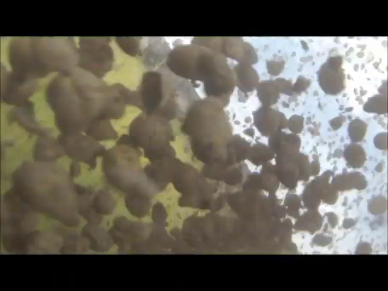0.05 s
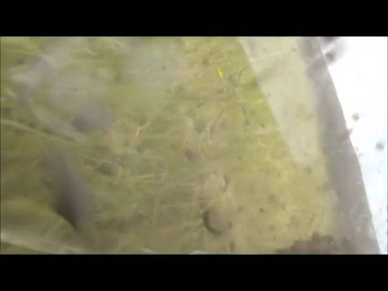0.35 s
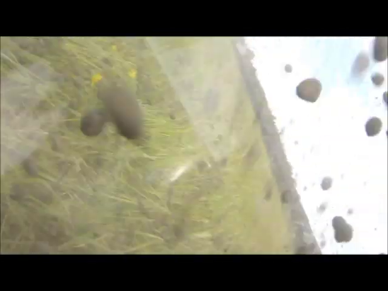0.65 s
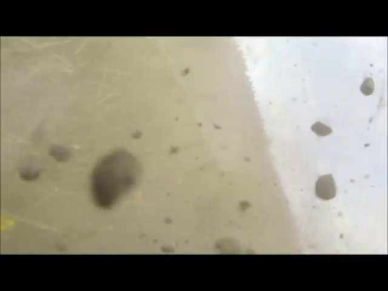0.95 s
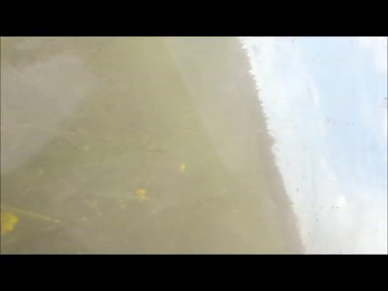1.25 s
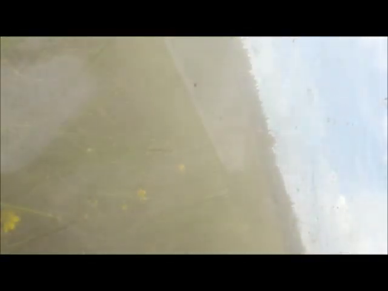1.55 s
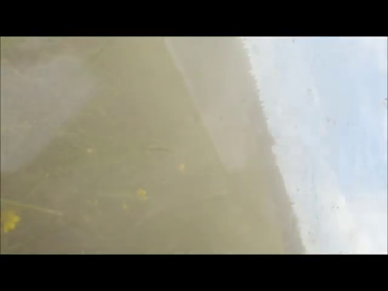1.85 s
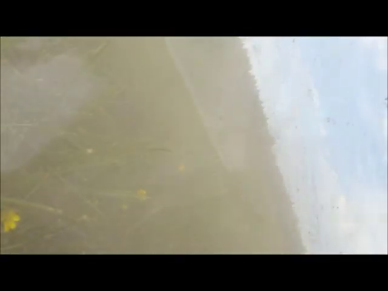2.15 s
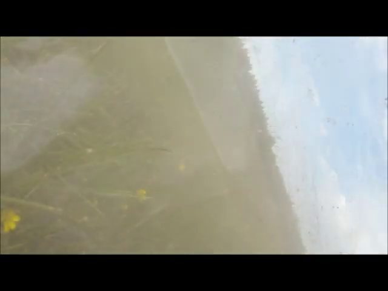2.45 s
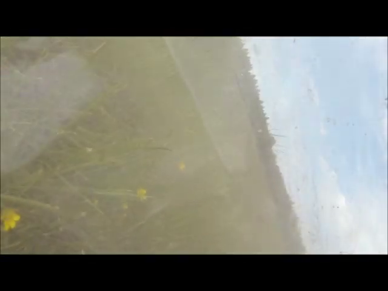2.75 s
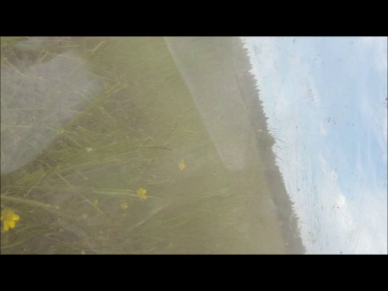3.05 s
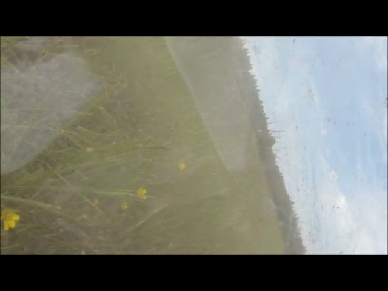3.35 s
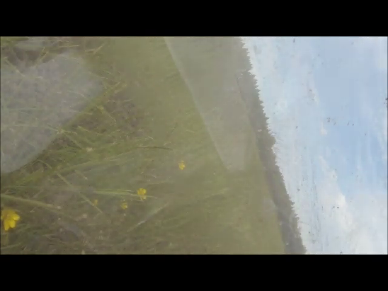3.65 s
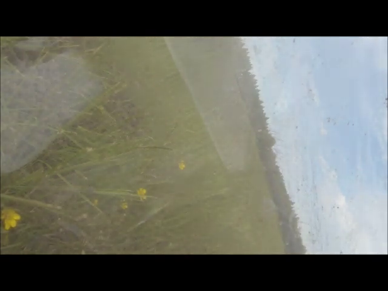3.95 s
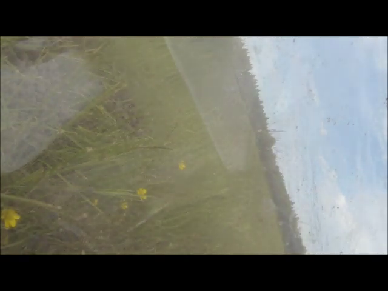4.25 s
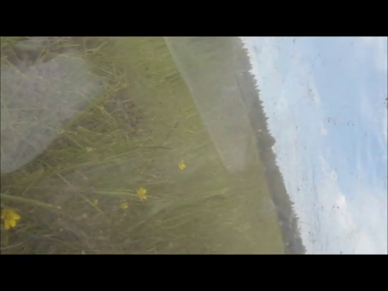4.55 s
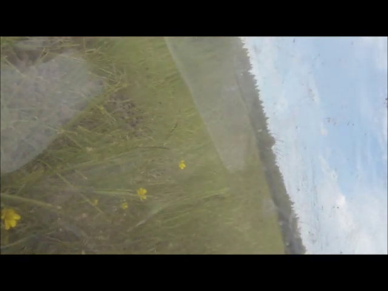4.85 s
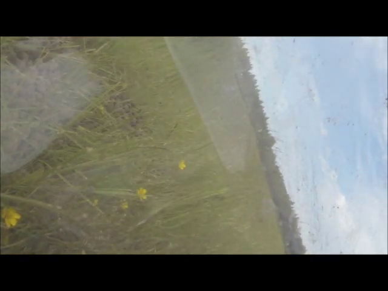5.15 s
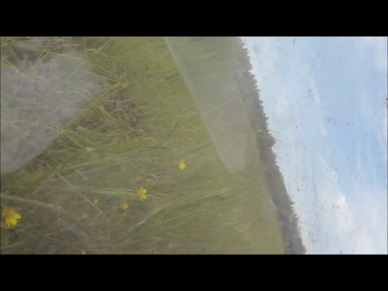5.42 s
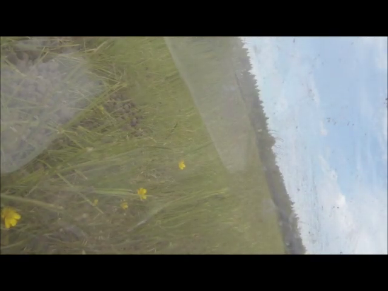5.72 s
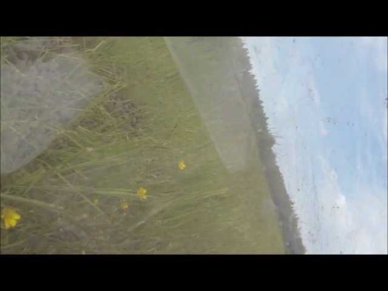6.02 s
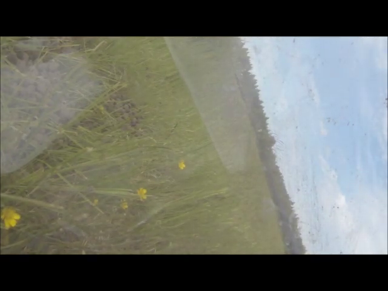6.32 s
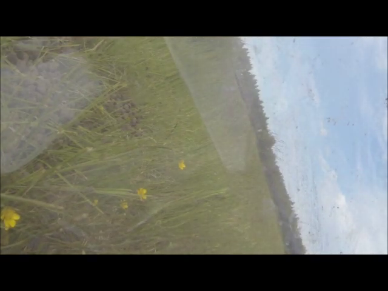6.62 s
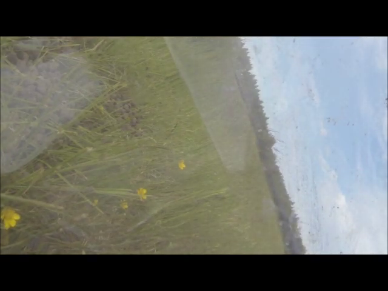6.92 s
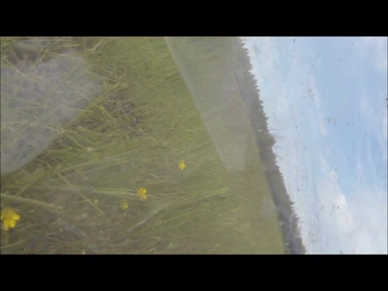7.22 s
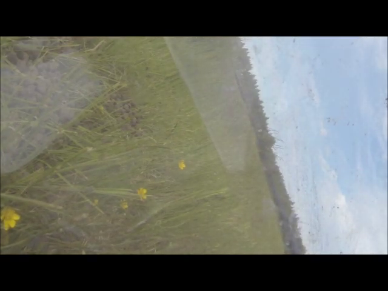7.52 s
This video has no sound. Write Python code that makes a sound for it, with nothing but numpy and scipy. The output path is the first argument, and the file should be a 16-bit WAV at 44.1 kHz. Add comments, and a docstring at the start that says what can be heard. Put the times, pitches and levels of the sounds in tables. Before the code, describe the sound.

A crashed motorcycle slides through rattling gravel, scrapes over grass and knocks to rest, leaving soft rustling and a faint distant engine.

```python
"""A fallen racing motorcycle slides off the track, heard from a microphone in its camera's sealed case.
Stones and clods pelt the case at point-blank range and set it ringing, the fairing scrapes over the grass
and the camera swings on its mount. After a few last knocks and a squeak the bike lies still;
dust sifts down, wind brushes grass against the case and an engine drones far away."""
import sys
import numpy as np
from scipy import signal
from scipy.fft import rfft, irfft, next_fast_len
from scipy.io import wavfile

SR = 44100
rng = np.random.default_rng(int(sys.argv[2]) if len(sys.argv) > 2 else 0)


def generate_wav(sig):
    """Save sig (samples, or channels by samples) to the path in sys.argv[1] as 16-bit PCM at SR."""
    pcm = np.round(np.clip(np.atleast_2d(sig).T, -1, 1) * 32767).astype(np.int16)
    wavfile.write(sys.argv[1], SR, pcm)


N = 343098

# Modes of the case around the microphone. Each row: frequency in Hz, width in Hz, relative level in dB.
CASE_MODES = [(1154, 80, -1), (1240, 110, -8), (1375, 130, 3), (1622, 167, 0), (2080, 230, -9),
              (2474, 260, -4), (2720, 160, -10), (3086, 240, -0.5), (3582, 80, -8), (4100, 320, -20),
              (5290, 310, -12.5), (6300, 270, -4.5), (7950, 760, -11.5), (10900, 910, -16)]
HIGH_MODES_ABOVE_HZ = 4000
# The dull push of a blow. Each row: frequency in Hz, relative level in dB.
THUD_SPECTRUM = [(60, 3), (130, 4.5), (300, -2.5), (600, -5), (850, -4.5), (1300, -9), (3500, -70.5)]
# How hard the sliding bike bears on the ground. Each row: time in seconds, relative level in dB.
GROUND_LOAD = [(0.0, -16), (0.04, -47), (0.08, -28.5), (0.27, -29.5), (0.62, -41.5), (0.66, -49.5),
               (0.9, -40), (1.04, -32), (1.1, -37), (1.16, -32.5), (1.39, -33.5), (2.08, -26),
               (2.25, -24.5), (2.3, -23), (2.88, -31), (3.1, -71)]
# Earth thrown at the case. Each row: start and hold in seconds, relative soil and grit levels in dB.
SPRAYS = [(0.0, 0.0045, -27, -32), (0.058, 0.018, -30.5, -44), (0.113, 0.11, -27, -40.5),
          (0.239, 0.078, -21.5, -42.5), (0.444, 0.048, -30.5, -47), (0.667, 0.066, -25, -32.5),
          (0.812, 0.064, -33, -39), (0.964, 0.19, -37.5, -51.5)]
SPRAY_ATTACK_S, SPRAY_RELEASE_S = 0.016, 0.016


def from_db(db):
    """Decibels as an amplitude gain."""
    return 10 ** (np.asarray(db) / 20)


def rms_one(x):
    """The signal scaled to rms 1."""
    return x / np.sqrt(np.mean(x ** 2) + 1e-20)


def gains(rows, fade_s=0.1):
    """Rows of (seconds, dB) as gains in time, fading to silence outside their span."""
    s, *columns = np.transpose(rows)
    t = np.arange(N) / SR
    outside = np.maximum(s[0] - t, 0) + np.maximum(t - s[-1], 0)
    fade = np.exp(-np.minimum(outside / fade_s, 20))
    return [from_db(np.interp(t, s, db)) * fade for db in columns]


def swells(rows, attack_s, release_s):
    """Rows of (start, hold, levels) as gains in time: each rises, holds and dies away; powers add."""
    t = np.arange(N) / SR
    power = 0
    for s, hold_s, *levels_db in rows:
        away = np.maximum(s - t, 0) / attack_s + np.maximum(t - s - hold_s, 0) / release_s
        power = power + from_db(levels_db)[:, None] ** 2 * np.exp(-2 * np.minimum(away, 20))
    return np.sqrt(power)


def dying(start_s, db, fall_db_per_s, attack_s=0.08):
    """A gain that comes in at start_s and then sinks steadily."""
    age = np.arange(N) / SR - start_s
    return from_db(db - fall_db_per_s * np.maximum(age, 0)) * np.exp(np.clip(age / attack_s, -20, 0))


def drift(rate, step=40):
    """A smooth random wander that changes about rate times a second; spread 1."""
    r = np.exp(-2 * np.pi * rate * step / SR)
    slow = signal.lfilter([1], [1, -2 * r, r * r], rng.standard_normal(N // step + 2002))[2000:]
    return np.interp(np.arange(N) / step, np.arange(len(slow)), rms_one(slow))


def colour(x, spectrum):
    """Causal (minimum-phase) filter with a spectrum of (Hz, dB) rows and unit power gain."""
    size = 2 * next_fast_len(N // 2 + SR // 8)
    hz, db = np.transpose(spectrum)
    bin_hz = np.arange(size // 2 + 1) * SR / size
    gain = rms_one(from_db(np.interp(np.log(bin_hz + 1), np.log(hz), db)))
    cepstrum = irfft(np.log(gain))
    cepstrum[1:size // 2] *= 2
    cepstrum[size // 2 + 1:] = 0
    return irfft(rfft(x, size) * np.exp(rfft(cepstrum)))[:N]


def noise(spectrum):
    """Steady noise with the given spectrum; rms 1."""
    return rms_one(colour(rng.standard_normal(N), spectrum))


def resonate(x, modes):
    """Parallel resonances of (Hz, width in Hz, dB) with deep valleys between them; rms 1."""
    out = 0
    for hz, width, db in modes:
        r = np.exp(-np.pi * width / SR)
        poles = [1, -2 * r * np.cos(2 * np.pi * hz / SR), r * r]
        out = out + from_db(db) * signal.lfilter([1, 0, -1], poles, x + 1e-18) * (1 - r * r) / 2
    return rms_one(out)


def grains(per_s, spread_db):
    """Random tiny contacts of very uneven size; rms 1."""
    sizes = from_db(spread_db * np.minimum(rng.exponential(1, N), 4)) * rng.choice([-1, 1], N)
    return rms_one(sizes * (rng.random(N) < per_s / SR))


def patter(spectrum, per_s, spread_db):
    """A stream of tiny contacts with the given spectrum; rms 1."""
    return rms_one(colour(grains(per_s, spread_db), spectrum))


def glide(rows, harmonics, jitter, fade_s):
    """A slightly unsteady tone on a path of (seconds, Hz, dB), with harmonics of (multiple, dB)."""
    s, hz, db = np.transpose(rows)
    level, = gains(np.c_[s, db], fade_s)
    pitch_hz = np.interp(np.arange(N) / SR, s, hz) * (1 + jitter * drift(51.7))
    phase = 2 * np.pi * np.cumsum(pitch_hz) / SR
    return level * np.sqrt(2) * sum(from_db(k_db) * np.sin(k * phase) for k, k_db in harmonics)


def background(air_db=-59.0, whine_db=-75.0, whine_hz=8380):
    """Dull open-air rumble beside the track, and a thin, steady whine from the case."""
    # The open air. Each row: frequency in Hz, relative level in dB.
    air_spectrum = [(18, -36), (30, -3.5), (65, 1), (90, -2), (155, -13.5), (226, -11.5), (279, -18.5),
                    (372, -13), (534, -23), (1100, -28.5), (1430, -50.5), (2420, -120)]
    whine = resonate(rng.standard_normal(N), [(whine_hz, 120, 0)])
    return from_db(air_db) * noise(air_spectrum) + from_db(whine_db) * whine


def slide(drone_db=0.5, rumble_db=-7.5, judder_db=2.0, earth_thud_db=-13.5):
    """The fairing catches on the ground in surges that ring bodywork and case; flying earth joins in."""
    # How sharply the fairing bites into the soil. Each row: time in seconds, dB relative to the load.
    fairing_bite = [(0.4, -1), (1.15, 0), (1.85, 3.5), (2.25, 1.5), (2.6, 6.5), (2.74, -2.5), (2.96, -0.5)]
    # Resonances of the bodywork. Each row: frequency in Hz, width in Hz, relative level in dB.
    body_modes = [(244, 10, -7), (277.1, 14, 6), (396, 40, -14), (580, 46, -36), (699, 16, -12),
                  (825.5, 9.1, -16.5)]
    # The frame rumbling over the ground. Each row: frequency in Hz, relative level in dB.
    rumble_spectrum = [(45, -20), (70, 8), (120, 1), (200, 3.5), (300, -35.5), (380, -3), (600, -11.5),
                       (900, -32), (4000, -57.5)]
    # Soft soil puts little treble into the case. Each row: frequency in Hz, relative gain in dB.
    soil_spectrum = [(100, -29), (700, -1.5), (950, -12.5), (1100, -3.5), (1650, 5), (2100, -1), (2500, -3),
                     (3200, -7.5), (3600, -13.5), (4000, -26), (5200, -17.5), (7000, -38), (11500, -41.5),
                     (15000, -56.5)]
    # Hard grit is brighter. Each row: frequency in Hz, relative gain in dB.
    grit_spectrum = [(1500, -29), (3500, -5.5), (4300, 1.5), (5200, 0), (6300, -9.5), (7300, -14),
                     (8200, -6.5), (11200, -8.5), (15000, -16.5)]
    load, = gains(GROUND_LOAD)
    bite, = gains(fairing_bite)
    soil, grit = swells(SPRAYS, SPRAY_ATTACK_S, SPRAY_RELEASE_S)
    scraping = np.hypot(load * bite, soil)
    grit = np.hypot(grit, dying(0, db=-46, fall_db_per_s=6))  # runs out as the bike leaves the gravel
    pressure = from_db(judder_db * drift(60))
    soil_contacts = grains(per_s=3200, spread_db=2.5) * pressure
    friction = rms_one(colour(resonate(soil_contacts, CASE_MODES), soil_spectrum))
    # the heavy bodywork passes on only the slow part of each contact
    lowpass = signal.butter(4, 1100, fs=SR, output="sos")
    body = resonate(signal.sosfilt(lowpass, grains(per_s=6000, spread_db=1.5)), body_modes)
    grit_contacts = grains(per_s=630, spread_db=4.0) * pressure
    sand = rms_one(colour(resonate(grit_contacts, CASE_MODES), grit_spectrum))
    rumble = from_db(drone_db) * body + from_db(rumble_db) * noise(rumble_spectrum)
    thuds = from_db(earth_thud_db) * patter(THUD_SPECTRUM, per_s=1200, spread_db=2.0)
    return scraping * friction + load * rumble + grit * sand + soil * thuds


def sway(wander_hz, mount_hz=38.8):
    """The camera swings on its springy mount at a wavering rate; rms 1."""
    return np.sqrt(2) * np.sin(2 * np.pi * np.cumsum(mount_hz + wander_hz * drift(8)) / SR)


def mount_shake(sway_db=-1.5, buffet_db=-11.5, follow_db=3.5):
    """The sliding bike keeps the mount swinging, jolts throw it further, and the ground buffets it."""
    # Jolts through the mount. Each row: start and hold in seconds, relative level in dB.
    mount_jolts = [(0.16, 0.047, -16.5), (0.28, 0.029, -14.5), (0.49, 0.16, -16.5), (1.5, 0.27, -22.5),
                   (2.4, 0.13, -20.5), (2.625, 0.021, -7.5), (2.79, 0.068, -9), (2.97, 0.047, -27)]
    load, = gains(GROUND_LOAD)
    jolts, = swells(mount_jolts, attack_s=0.017, release_s=0.039)
    swing = np.hypot(from_db(follow_db) * load, jolts)
    buffet = noise([(15, 0), (35, 1), (60, -0.5), (90, -12.0), (160, -31.5), (400, -46.5), (1000, -91.0)])
    return swing * (from_db(sway_db) * sway(wander_hz=1.3) + from_db(buffet_db) * buffet)


def blows(rows, contact_s, crack_s, thud_s, ring_db, crack_db, splinter_db, thud_db,
          focus_octaves=0.68, scatter_db=2.0):
    """Each rough contact rings the case near a centre pitch, with a sharp crack and a dull thud."""
    t = np.arange(SR // 20) / SR
    attack = t < .004
    hz, width, mode_db = np.transpose(CASE_MODES)
    high = hz > HIGH_MODES_ABOVE_HZ
    modes = np.cos(2 * np.pi * np.outer(hz, t)) * np.exp(-np.pi * np.outer(width, t))
    # the walls of the case radiate between a soft lower edge and a steep upper one
    wall = np.vstack([signal.butter(4, 1350, "high", fs=SR, output="sos"),
                      signal.butter(8, 3350, fs=SR, output="sos")])
    ringing, cracks, thuds = np.zeros((3, N))

    def at_level(x, db):
        """One blow's length of x, with the rms of its attack set to db."""
        return x[:len(t)] * from_db(db) / np.sqrt(np.mean(x[:len(t)][attack] ** 2))

    for s, level_db, centre_hz, sharp_db, low_db in rows:
        size, coupling = rng.standard_normal((2, len(hz)))
        crumbs, snap, push = rng.standard_normal((3, len(t)))
        off_centre = 1 + (np.log2(hz / centre_hz) / focus_octaves) ** 2
        strength = from_db(mode_db + scatter_db * size) * np.sign(coupling) / off_centre
        contact = crumbs * np.exp(-t / contact_s)
        ring = signal.sosfilt(wall, signal.fftconvolve((strength * ~high) @ modes, contact))
        crack = snap * np.exp(-t / crack_s)
        splinter = signal.fftconvolve((coupling * high) @ modes, crack)  # the crack rings the high modes
        sharp = at_level(crack, crack_db) + at_level(splinter, splinter_db)
        span = slice(round(s * SR), round(s * SR) + len(t))
        ringing[span] += at_level(ring, level_db + ring_db)
        cracks[span] += from_db(level_db + sharp_db) * sharp
        thuds[span] += at_level(push * np.exp(-t / thud_s), level_db + low_db + thud_db)
    # Sharp contact noise. Each row: frequency in Hz, relative level in dB.
    crack_spectrum = [(2200, -14), (3300, 4), (4300, 0.5), (5500, -1), (7100, -9), (8300, 0),
                      (10000, -12.5), (12000, -10.5), (15000, -21), (17000, -24)]
    return ringing + colour(cracks, crack_spectrum) + colour(thuds, THUD_SPECTRUM)


def pebbles(count=60, above_grit_db=15.5, spread_db=4, centre_hz=2320, crack_db=-9.5, thud_db=-8):
    """Rows of blows for small stones that arrive at random, as strong as the spray that carries them."""
    _, grit = swells(SPRAYS, SPRAY_ATTACK_S, SPRAY_RELEASE_S)
    end_s = SPRAYS[-1][0] + SPRAYS[-1][1]
    starts = (np.arange(count) + rng.random(count)) / count * end_s
    size, pitch = rng.standard_normal((2, count))
    level_db = 20 * np.log10(grit[(starts * SR).astype(int)]) + above_grit_db - spread_db * size
    ring_hz = centre_hz * 2 ** (0.25 * pitch)
    return [(s, db, hz, crack_db, thud_db) for s, db, hz in zip(starts, level_db, ring_hz)]


def stones():
    """Stones and pebbles bounce off the case at once, right at the microphone."""
    # The larger stones. Each row: start in seconds, level in dB, ring centre in Hz,
    # relative crack and thud levels in dB.
    stone_hits = [(0.0227, -21.5, 1768, -39, -18.5), (0.0875, -19, 2320, -25, -13),
                  (0.1152, -17.5, 2600, -22.5, -19), (0.1471, -18, 2320, -13, -19),
                  (0.1644, -17.5, 2030, -10.5, -10), (0.1784, -8.5, 2000, -10.5, -9),
                  (0.296, -18, 2240, -5.5, -9), (0.3254, -4.5, 1930, -15, -5.5),
                  (0.3376, -19.5, 2480, -8.5, -10.5), (0.364, -22.5, 2200, -21.5, -9.5),
                  (0.3899, -11.5, 2350, -6.5, -2), (0.429, -22.5, 2180, -2.5, -18.5),
                  (0.4719, -10.5, 1550, -13.5, -19.5), (0.4994, -10.5, 2200, -6, -3),
                  (0.5193, -20, 1840, -2.5, -23.5), (0.5281, -11.5, 2150, -12, -9),
                  (0.5523, -16.5, 2350, -6, -0.5), (0.5575, -10.5, 2100, -16.5, -27),
                  (0.5692, -18, 1600, -8.5, -25), (0.5892, -19, 2820, -10, -20.5),
                  (0.6355, -13.5, 2330, -8.5, -15.5), (0.6433, -12, 2340, -9.5, -24.5),
                  (0.6536, -17.5, 2600, 0, -4.5), (0.6634, -10, 2300, -12.5, -6),
                  (0.7573, -9, 1470, -15, -10.5), (0.7746, -13.5, 2080, -10, -9),
                  (0.7945, -30, 1600, -20, -17), (0.8083, -19, 2160, -18.5, -18),
                  (0.8243, -15.5, 2210, -7.5, -43.5), (0.839, -18, 2610, -15, -1),
                  (0.855, -9.5, 1630, -20.5, -25.5), (0.89, -23, 1600, -10.5, -28),
                  (0.9215, -22.5, 2440, -10.5, -29), (0.9465, -25, 2800, -9.5, -16),
                  (0.9827, -22, 2500, -4, -13.5), (1.0073, -8.5, 2750, -19, -34),
                  (1.048, -24.5, 2470, -9, -28), (1.0671, -7.5, 1860, -16, -19),
                  (1.105, -22, 1690, -11.5, -22), (1.2301, -14.5, 2120, -11.5, -26)]
    return blows(stone_hits + pebbles(), contact_s=0.0011, crack_s=0.0016, thud_s=0.003,
                 ring_db=0.0, crack_db=1.0, splinter_db=-10.0, thud_db=1.0)


def clods():
    """Clods crumble on the case, giving way over several milliseconds."""
    # Each row: start in seconds, relative level in dB, ring centre in Hz, crack and thud offsets in dB.
    clod_hits = [(0.218, -18, 1610, -10, -27), (0.2328, -13.5, 1608, -35, -9),
                 (0.6705, -16.5, 2296, -6.5, -6.5), (0.6803, -9, 2000, -8, -5),
                 (0.6943, -12.5, 1795, -8.5, -11.5), (0.7085, -15.5, 1900, -7, -8),
                 (0.7279, -17, 2290, -8, -5.5)]
    return blows(clod_hits, contact_s=0.0015, crack_s=0.0056, thud_s=0.0023,
                 ring_db=-1.5, crack_db=-4.0, splinter_db=-10.5, thud_db=3.5)


def grit_ticks(level_db=-1.5, scratch_s=0.0047, direct_db=-8.0):
    """Each bit of grit scratches briefly and rings the high modes of the case in a mix of its own."""
    # Single bits of grit. Each row: start in seconds, relative peak in dB.
    grit_hits = [(1.479, -43), (1.8214, -31.5), (2.197, -34), (2.3344, -38), (2.465, -38)]
    t, out = np.arange(SR // 40) / SR, np.zeros(N)
    hz, width, mode_db = np.transpose([mode for mode in CASE_MODES if mode[0] > HIGH_MODES_ABOVE_HZ])
    modes = np.sin(2 * np.pi * np.outer(hz, t)) * np.exp(-np.pi * np.outer(width, t))
    for s, peak_db in grit_hits:
        scratch = rng.standard_normal(len(t)) * np.exp(-t / scratch_s)
        strength = rng.standard_normal(len(hz)) * from_db(mode_db)
        ring = signal.fftconvolve(strength @ modes, scratch)[:len(t)]
        tick = rms_one(ring) + from_db(direct_db) * rms_one(np.diff(scratch, prepend=0))
        start = round(s * SR)
        out[start:start + len(t)] += from_db(peak_db + level_db) * tick / np.abs(tick).max()
    return out


def knocks():
    """The heavy bike knocks on the ground as it stops, in longer, clattering contacts."""
    # Each row: start in seconds, relative level in dB, ring centre in Hz, crack and thud offsets in dB.
    ground_hits = [(2.597, -14.5, 2710, -32, -20), (2.6047, -11, 1380, -32, -6),
                   (2.6244, -18, 1700, -39, 1), (2.700, -12.5, 1400, -25, -6),
                   (2.7555, -11, 2640, -31.5, -7), (2.7663, -13.5, 2100, -28, -6),
                   (2.8811, -18.5, 1620, -30, -28), (3.038, -34, 1400, -30, -29)]
    return blows(ground_hits, contact_s=0.0055, crack_s=0.0055, thud_s=0.007,
                 ring_db=-3.0, crack_db=-13.5, splinter_db=-3.0, thud_db=0.0)


def squeak():
    """Plastic close by squeaks down in pitch as the bike settles."""
    # Each row: time in seconds, pitch in Hz, relative level in dB.
    squeak_path = [(2.793, 1770, -34.5), (2.798, 1650, -21), (2.806, 1640, -18.5), (2.812, 1544, -28),
                   (2.822, 1240, -15), (2.828, 1200, -26), (2.84, 1200, -45)]
    return glide(squeak_path, harmonics=[(1, -0.5), (2, -21)], jitter=0.011, fade_s=0.0034)


def grass(rest_s=3.0, stalk_ring_db=-3.0):
    """Once the bike lies still, grass brushes the case in soft swells; the stir between them dies down."""
    # Each row: start and hold of a brush in seconds, relative rustle and hiss levels in dB.
    brushes = [(3.03, 0.18, -50, -81), (3.32, 0.09, -46, -56), (3.48, 0.067, -53, -54),
               (3.68, 0.17, -58, -67), (3.9, 0.027, -48, -54), (4.09, 0.1, -49, -54.5),
               (4.8, 0.055, -53.5, -61.5), (5.01, 0.014, -50.5, -55), (5.11, 0.044, -54, -61),
               (5.47, 0.067, -64, -60.5), (5.6, 0.066, -51.5, -56.5), (6.09, 0.1, -51, -60.5),
               (6.3, 0.12, -62, -68), (6.59, 0.014, -55.5, -63), (7.39, 0.015, -56, -68.5),
               (7.49, 0.25, -59, -81.5)]
    # Dry stalks ring as they spring back. Each row: frequency in Hz, width in Hz, relative level in dB.
    stalk_modes = [(2780, 430, -2), (4440, 430, -3.5)]
    # Stalks rustling on the case. Each row: frequency in Hz, relative level in dB.
    rustle_spectrum = [(300, -13.5), (600, -12.5), (1050, -12.5), (1350, -2), (1620, 3), (1900, -5.5),
                       (2700, -2.5), (3200, -11), (3800, -21.5), (4600, -22.5), (5400, -27), (9000, -34.5)]
    # The fine hiss of the blades. Each row: frequency in Hz, relative level in dB.
    hiss_spectrum = [(1800, -17), (3000, 10.5), (3800, 9.5), (4600, 10.5), (5400, -1.5), (7000, -5.5),
                     (8400, 4), (10000, -8.5), (12200, -3), (15000, -23.5), (16000, -50)]
    rustle, hiss = swells(brushes, attack_s=0.041, release_s=0.064)
    springing = from_db(stalk_ring_db) * hiss * resonate(grains(per_s=2500, spread_db=1.5), stalk_modes)
    rustle = np.hypot(rustle, dying(rest_s, db=-56.5, fall_db_per_s=0.56))
    hiss = np.hypot(from_db(-2.0) * hiss, dying(rest_s, db=-61, fall_db_per_s=2.5))
    stalks = patter(rustle_spectrum, per_s=6000, spread_db=2.0)
    blades = patter(hiss_spectrum, per_s=3000, spread_db=3.5)
    return rustle * stalks + hiss * blades + springing


def wind(buffet_db=-4.5, calm_db=-63):
    """Gusts push on the case and sway the mount."""
    # Each row: start and hold of a gust in seconds, relative level in dB.
    gusts = [(3.1, 0.21, -42.5), (3.92, 0.23, -56.5), (6.25, 0.11, -49.5), (6.68, 0.14, -42.5)]
    # Wind on the case. Each row: frequency in Hz, relative level in dB.
    wind_spectrum = [(15, -3.5), (26, -15), (38, -2.5), (55, -6.5), (90, -40.5), (200, -28), (500, -39.5),
                     (2000, -56)]
    gusting, = swells(gusts, attack_s=0.056, release_s=0.17)
    force = np.hypot(gusting, from_db(calm_db))
    return force * (from_db(buffet_db) * noise(wind_spectrum) + sway(wander_hz=1.4))


def dust():
    """Thrown-up dust patters on the case and thins out."""
    # Each row: start and hold of a fall in seconds, level in dB.
    dust_falls = [(3.24, 0.013, -57), (3.49, 0.032, -59)]
    # Fine dust on the case. Each row: frequency in Hz, relative level in dB.
    dust_spectrum = [(4000, -22), (6000, -7), (8400, 7), (10000, 0), (12500, 0), (15500, -15)]
    falling, = swells(dust_falls, attack_s=0.02, release_s=0.25)
    return falling * patter(dust_spectrum, per_s=3300, spread_db=5.0)


def far_engine(waver_db=3.9):
    """An engine a long way off drones at its firing rate, its level wavering."""
    # Each row: time in seconds, firing rate in Hz, relative level in dB.
    engine_path = [(3.6, 116, -76), (4.15, 123, -76), (4.7, 131.5, -76), (5.0, 112.9, -74),
                   (5.4, 89.7, -62), (6.2, 91.8, -72), (7.1, 88.24, -70.5), (7.6, 88.7, -57)]
    # Each row: multiple of the firing rate, relative level in dB.
    engine_harmonics = [(1, -1.5), (2, -5.5), (3, -7), (4, -21)]
    drone = glide(engine_path, engine_harmonics, jitter=0.005, fade_s=0.26)
    return drone * from_db(waver_db * drift(1.1))


def scene():
    """Everything reaches the one microphone inside the case."""
    crash = slide() + mount_shake() + stones() + clods() + grit_ticks() + knocks() + squeak()
    trackside = background() + grass() + wind() + dust() + far_engine()
    return (crash + trackside)[None]


def record(dry, cutoff_hz=15500):
    """The hardest hits overload the microphone input; the top is cut."""
    clipped = dry / (1 + dry ** 6) ** (1 / 6)
    return signal.sosfilt(signal.ellip(10, .2, 80, cutoff_hz, fs=SR, output="sos"), clipped)


dry = scene()
out = record(dry)
generate_wav(out)
```